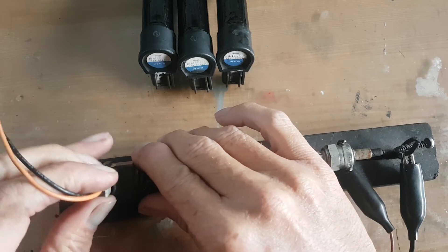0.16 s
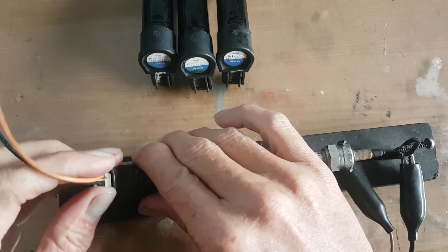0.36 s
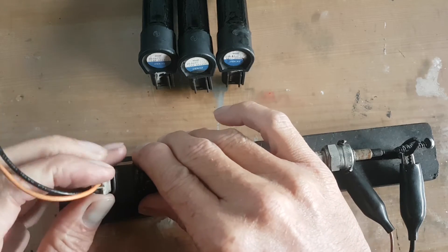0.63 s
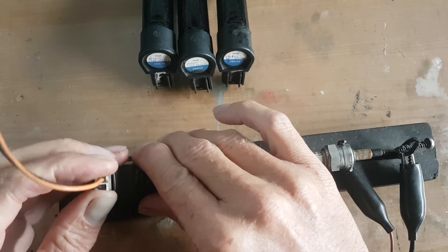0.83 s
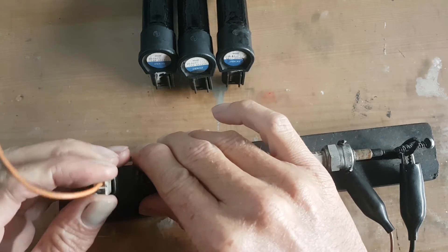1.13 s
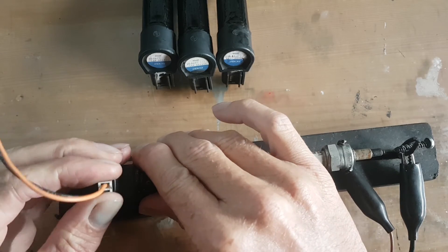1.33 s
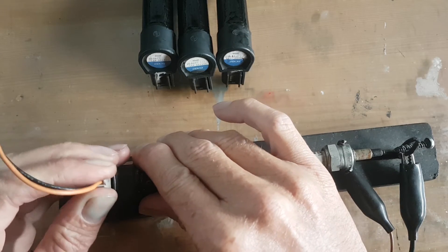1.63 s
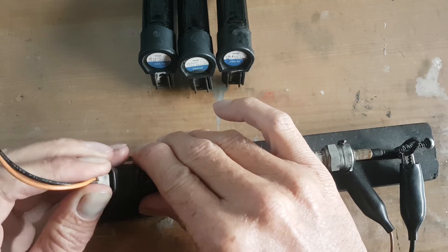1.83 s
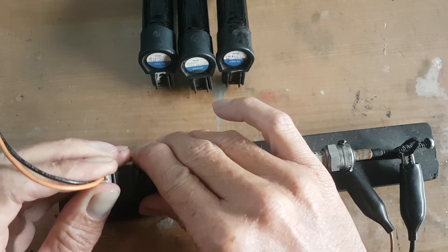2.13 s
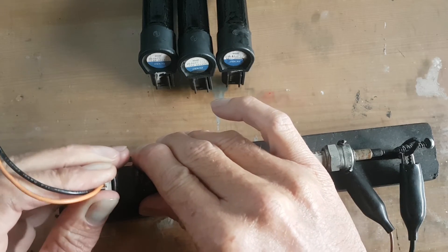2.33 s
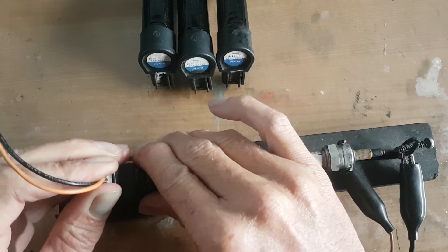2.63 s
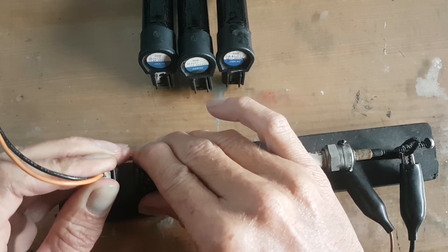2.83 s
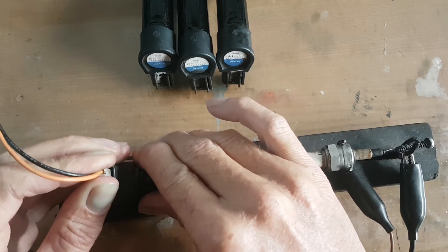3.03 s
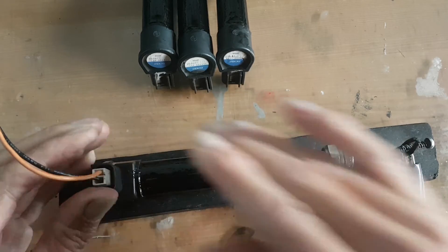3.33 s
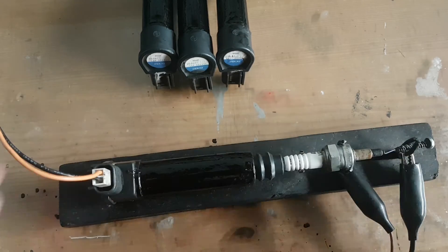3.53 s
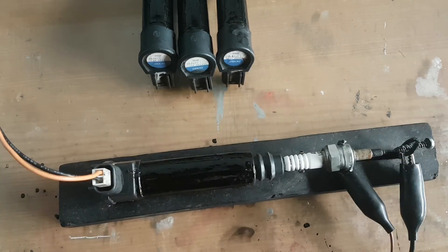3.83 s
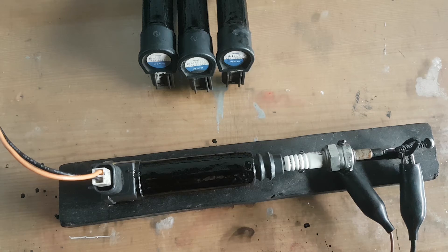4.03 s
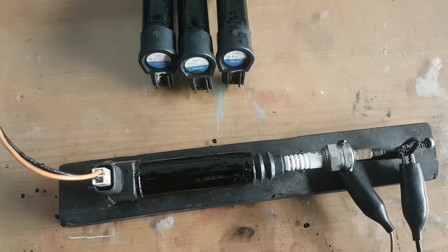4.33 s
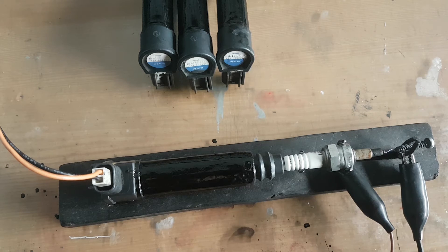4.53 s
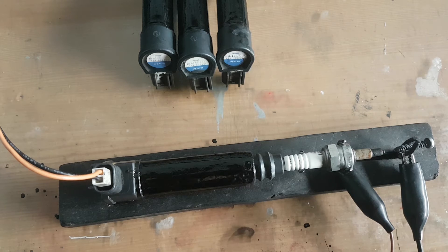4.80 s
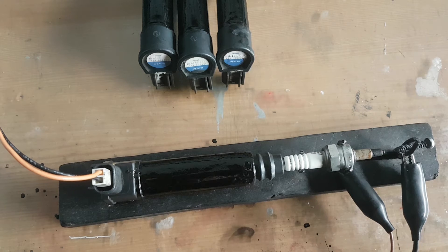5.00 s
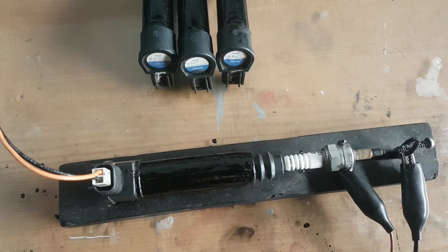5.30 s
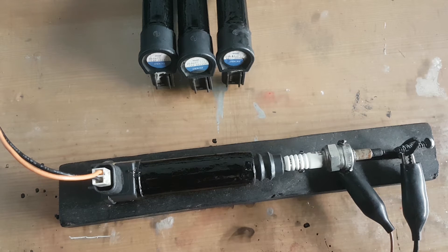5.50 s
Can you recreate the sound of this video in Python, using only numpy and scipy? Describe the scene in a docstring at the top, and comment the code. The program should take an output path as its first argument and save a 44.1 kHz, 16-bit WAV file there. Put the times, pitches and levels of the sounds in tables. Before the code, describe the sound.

An ignition coil gives a few stray snaps, then fires a spark plug in a fast, even crackle over a faint hum.

```python
"""An ignition coil and spark plug on a wooden workbench in a small room, heard close up in stereo.
Over humming bench equipment and a small fan to the right, a plug is pressed home, knocking the coil.
The contact catches three times for a moment, then holds at about 2 s: sparks snap sixteen times a
second, each echoing off bench and walls, and the fan's whine sinks a little under the load.
Near 3.5 s the hand lifts away, the coil's casing rings with each firing, and the plug ticks once."""
import sys
import numpy as np
from scipy import signal
from scipy.fft import rfft, irfft
from scipy.io import wavfile

SR = 44100
rng = np.random.default_rng(int(sys.argv[2]) if len(sys.argv) > 2 else 0)


def unload_audio(sound):
    """Save the sound as a 16-bit wav file, at the path given as the first command line argument."""
    columns = np.transpose(np.atleast_2d(sound))
    # keep every value between -1 and 1, then stretch to whole-number steps
    steps = np.round(np.clip(columns, -1, 1) * 32767)
    wavfile.write(sys.argv[1], SR, steps.astype(np.int16))


N = 249606
CUTOFF_HZ = 16500

# spells of electrical contact: first_spark_s, end_s, strength_db
CONTACTS = [(.3681, .40, 1.0), (.7985, .95, .5), (1.5996, 1.63, -1.8), (2.0909, 5.66, 0)]
# the hand rests on the coil beside the gap, then lifts: time_s, echo_delay_s, echo_db, casing_gain_db
HAND = [(0, 0.00041, -18, -75), (3.25, 0.00045, -27, -59), (3.47, 0.001, -30, -36.5),
        (3.68, 0.0022, -43, -41)]


def sparks(period_s=.0626987, shortfall_s=.000347, settle_sparks=19.75):
    """The driver fires while contact holds, a little fast at first: start_s, strength_db of each spark."""
    k = np.arange(N / SR / period_s)
    since_s = k * period_s - shortfall_s * settle_sparks * (1 - np.exp(-k / settle_sparks))
    return [(s, db) for start, end, db in CONTACTS for s in start + since_s if s < end]


def discharges(spread_db, sizzle, sizzle_s, size=64):
    """Each spark is one pressure spike and a brief sizzle that changes with the path of the arc."""
    out, t = np.zeros(N + SR), np.arange(size) / SR
    hand_s, hand_delay_s, hand_db, _ = np.transpose(HAND)
    for s, db in sparks():
        pulse = sizzle * np.diff(rng.standard_normal(size + 1)) * np.exp(-t / sizzle_s)   # mostly treble
        pulse[0] = 1
        pulse *= from_db(db + spread_db * rng.standard_normal())
        at = round(s * SR)
        out[at:at + size] += pulse
        at += round(np.interp(s, hand_s, hand_delay_s) * SR)   # once more off the hand
        out[at:at + size] += pulse * from_db(np.interp(s, hand_s, hand_db))
    return out[:N]


def snap_response(right_lag_s, low_cut_hz, size=4096):
    """Heavily damped resonances reach the microphones directly, then off the bench and nearby walls."""
    # resonances of one snap: pitch_hz, width_hz, left_db, right_db
    resonances = [(352, 451, -28, -25.5), (952, 179, -30.5, -25), (1350, 318, -28, -22),
                  (2496, 686, -24, -21), (3530, 397, -24.5, -19), (4597, 320, -32.5, -26),
                  (6150, 453, -40, -27.5), (7550, 680, -47.5, -27), (9200, 1380, -29.5, -37),
                  (11130, 1440, -23.5, -27.5), (13030, 650, -22, -43), (15200, 580, -29.5, -43)]
    # distinct echoes: left_delay_s, right_delay_s, left_db, right_db, dull_above_hz
    echoes = [(.00255, 0.002818, -10.5, -14, 3770), (.0096, 0.0094, -25.5, -24, 6000),
              (0.021, .0194, -13.5, -14.5, 1600), (0.046, 0.036, -41, -32.5, 6000)]
    t, hz = np.arange(size) / SR, np.fft.rfftfreq(size, 1 / SR)
    direct = 0
    for k, (pitch_hz, width_hz, left_db, right_db) in enumerate(resonances):
        ring = np.exp(-np.pi * width_hz * t) * np.sin(2 * np.pi * pitch_hz * t)
        direct += (-1) ** k * from_db([[left_db], [right_db]]) * ring
    delay = lambda left_s, right_s: np.exp(-2j * np.pi * hz * np.array([[left_s], [right_s]]))
    paths = delay(0, right_lag_s)
    for left_s, right_s, left_db, right_db, dull_hz in echoes:
        paths += from_db([[left_db], [right_db]]) * delay(left_s, right_s) / (1 + 1j * hz / dull_hz)
    small_source = 1j * hz / (low_cut_hz + 1j * hz)   # a tiny arc radiates little bass
    return irfft(rfft(direct) * paths * small_source, size)


def coil_ring():
    """Every firing jolts the coil's casing, which rings more freely once the hand no longer damps it."""
    # casing modes: pitch_hz, gain_db, t60_s
    casing = [(2550, 1, 0.0069), (3550, -4, 0.0053), (3750, -8, 0.011)]
    hand_s, _, _, ring_db = np.transpose(HAND)
    return struck([(s, db + np.interp(s, hand_s, ring_db)) for s, db in sparks()], casing)


def bench_knock():
    """Pushing the plug home knocks the coil on the wooden bench."""
    # the push: start_s, strength_db
    knocks = [(.2615, -42.5)]
    # modes of coil and bench: pitch_hz, gain_db, t60_s
    bench = [(151, -5, 0.11), (225.5, -2, 0.18), (337, -1, 0.042), (597, -1.5, .06), (1040, -8, 0.017),
             (1630, -2.5, 0.011), (2500, -4, 0.0072), (4670, -3.5, 0.0084)]
    return struck(knocks, bench)


def socket_tick():
    """The released plug ticks in its plastic socket."""
    # the release: start_s, strength_db
    ticks = [(3.6998, -38.5)]
    # socket modes: pitch_hz, gain_db, t60_s
    socket = [(2020, 4.5, 0.013), (2360, 4, 0.0072), (2800, -1, 0.01), (3400, -4, 0.012),
              (4600, -8, 0.0065), (6100, -4, .006)]
    return struck(ticks, socket)


def room_response(build_s, early_db, early_s, scatter_hz, size=24000, bands=15):
    """Diffuse reflections: early scatter from things on the bench, then a tail dying band by band."""
    # the room's colour and decay: frequency_hz, left_db, right_db, t60_s
    room = [(260, -25, -16, 0.76), (460, -20, -10, 0.55), (610, -11.5, -15, 0.41), (908, -11.5, -2, 0.32),
            (1310, -15.5, -11.5, 0.68), (2240, -21.5, -14.5, 0.7), (3360, -14.5, -11, 0.061),
            (4650, -24.5, -21, 0.45), (7200, -24.5, -17.5, 0.17), (9200, -24.5, -34, 0.19),
            (12200, -18, -33, 0.27), (15700, -28, -53, 0.33)]
    t, hz = np.arange(size) / SR, np.fft.rfftfreq(size, 1 / SR)
    colour = from_db([at_hz(room, hz, column=1), at_hz(room, hz, column=2)])
    field = rfft(rng.standard_normal((2, size))) * colour
    edges_hz, out = np.geomspace(170, CUTOFF_HZ, bands + 1), 0
    for low, high in zip(edges_hz, edges_hz[1:]):
        centre_hz = np.sqrt(low * high)
        band = irfft(field * (hz >= low) * (hz < high), size)
        tail = from_db(-60 * t / at_hz(room, centre_hz, column=3))
        scatter = centre_hz / (centre_hz + scatter_hz)   # small things scatter short waves
        early = from_db(early_db) * np.exp(-t / early_s) * scatter
        out += band * (tail + early) / np.sqrt(np.sum(tail ** 2))
    return out * (1 - np.exp(-(t / build_s) ** 2))


def equipment_hum(drone_hz=147.2, drone_trim_db=-1):
    """Bench equipment hums dead centre, with one drone of fixed pitch that swells and sinks."""
    # hum lines: pitch_hz, level_db, waver_db
    lines = [(70, -65, 6), (93.7, -64, 5), (229, -69, 3), (352, -77, 3), (476.5, -75.5, 5.5)]
    # the drone's swell: time_s, gain_db
    swell = [(0.0, -67), (0.14, -53), (0.76, -78), (1.23, -52.5), (1.48, -63.5), (3.59, -54.5),
             (3.64, -62.5), (5.55, -54), (5.66, -57)]
    swell_db = np.interp(np.arange(N) / SR, *np.transpose(swell))
    hum = sum(tone(hz, db, waver_db, wander_rad=0.21 * waver_db) for hz, db, waver_db in lines)
    return hum + tone(drone_hz, swell_db + drone_trim_db, waver_db=2.5, wander_rad=0.74)


def fan(idle_hz=118.8, blades=5, sag=.018, sag_s=.6, whine_gain_db=2.5, right_db=3.0):
    """The rotor hums and the blades whine to the right, slowing once the coil draws current steadily."""
    # blade tone: harmonic, gain_db
    harmonics = [(1, -68), (2, -86), (3, -81.5), (4, -73.5), (5, -80), (6, -86), (7, -87)]
    loaded_s = np.maximum(np.arange(N) / SR - CONTACTS[-1][0], 0)
    rotor_hz = idle_hz * (1 - sag * (1 - np.exp(-loaded_s / sag_s)))
    rotor = tone(rotor_hz, level_db=-54, waver_db=1.17, wander_rad=0.15)
    whine = sum(tone(k * blades * rotor_hz, db + whine_gain_db, 1.4, wander_rad=0.14, apart_rad=1.0)
                for k, db in harmonics)
    return rotor + whine * from_db([[-right_db / 2], [right_db / 2]])


def room_tone(rumble_db=-58, hiss_db=-61.5):
    """Low rumble arrives alike at both microphones; the fan's hiss is diffuse."""
    # room rumble: frequency_hz, relative_density_db
    rumble = [(15, -28), (38, -17), (62, 3.5), (110, -0.5), (145, 2), (180, -8.5), (250, -10), (400, -25),
              (800, -74)]
    # air moved by the fan: frequency_hz, relative_density_db
    hiss = [(160, -10.5), (280, -14), (480, -12), (700, -16), (1050, -19.5), (1830, -17.5), (2400, -22.5),
            (3050, -22), (4000, -29), (6500, -34), (9000, -40.5), (13000, -34), (16000, -41)]
    return from_db(rumble_db) * noise(rumble) + from_db(hiss_db) * noise(hiss, channels=2)


def struck(events, modes, size=12000):
    """Light blows set the modes of an object ringing."""
    t, blows = np.arange(size) / SR, np.zeros(N)
    for s, db in events:
        blows[round(s * SR)] = from_db(db)
    ring = sum((-1) ** k * from_db(db - 60 * t / t60_s) * np.sin(2 * np.pi * hz * t)
               for k, (hz, db, t60_s) in enumerate(modes))
    return through(blows, ring[None])


def tone(hz, level_db, waver_db, wander_rad, apart_rad=0):
    """A sine that wavers in level and phase and reaches the two microphones apart_rad out of step."""
    cycles = np.cumsum(hz * np.ones(N)) / SR + rng.random()
    phase = 2 * np.pi * cycles + wander_rad * drift(rate_hz=1.57)
    waver = from_db(waver_db * drift(rate_hz=1.85))
    return from_db(level_db) * rms_one(waver * np.sin(phase + np.array([[0], [apart_rad]])))


def noise(spectrum, channels=1):
    """Steady noise of a given colour, rms 1."""
    hz = np.fft.rfftfreq(N, 1 / SR)
    return rms_one(irfft(rfft(rng.standard_normal((channels, N))) * from_db(at_hz(spectrum, hz)), N))


def drift(rate_hz):
    """Slow random wander, rms 1."""
    hz = np.fft.rfftfreq(N, 1 / SR)
    return rms_one(irfft(rfft(rng.standard_normal(N)) / (1 + (hz / rate_hz) ** 4), N))


def through(x, response):
    """Play a signal through an impulse response."""
    return signal.fftconvolve(np.atleast_2d(x), response, axes=1)[:, :N]


def at_hz(points, hz, column=1):
    """Read one column of a spectrum table on a log-frequency axis."""
    table = np.array(points)
    return np.interp(np.log(np.maximum(hz, 1)), np.log(table[:, 0]), table[:, column])


def from_db(db):
    """Decibels to gain."""
    return 10 ** (np.asarray(db) / 20)


def rms_one(x):
    """Scale to unit rms."""
    return x / np.sqrt(np.mean(x ** 2) + 1e-20)


def scene():
    """Sparks and handling sound in one room, over the hum, the fan and the room tone."""
    room = room_response(build_s=0.00069, early_db=21, early_s=0.0019, scatter_hz=1820)
    arcs = discharges(spread_db=0.1, sizzle=0.068, sizzle_s=0.0012)
    snap = snap_response(right_lag_s=.00016, low_cut_hz=240)
    snaps = from_db(-0.96) * through(arcs, snap) + through(arcs, room)
    handling = bench_knock() + socket_tick()
    background = equipment_hum() + fan() + room_tone()
    return snaps + coil_ring() + handling + from_db(10) * through(handling, room) + background


def record(dry):
    """A steep low-pass cuts the highest treble."""
    return signal.sosfilt(signal.ellip(10, .1, 80, CUTOFF_HZ, fs=SR, output="sos"), dry)


dry = scene()
out = record(dry)
unload_audio(out)
```